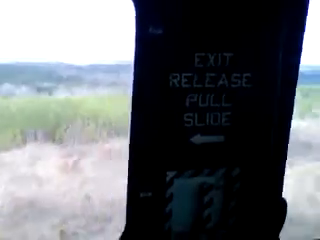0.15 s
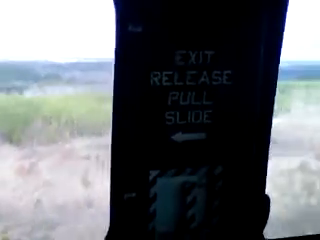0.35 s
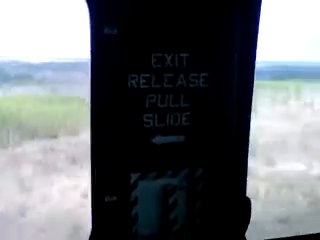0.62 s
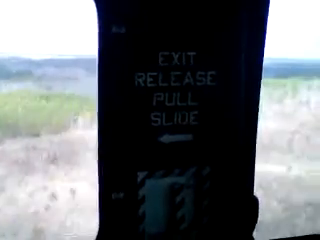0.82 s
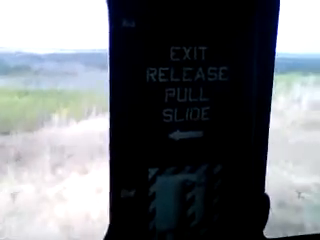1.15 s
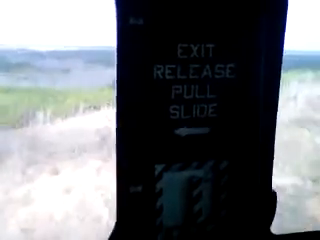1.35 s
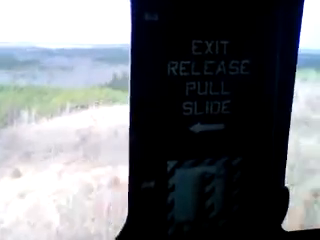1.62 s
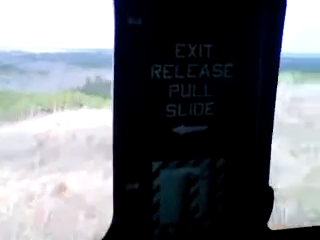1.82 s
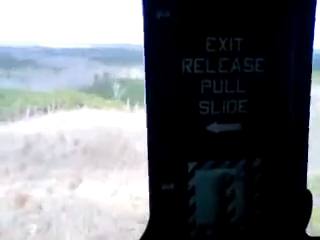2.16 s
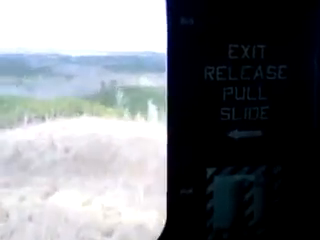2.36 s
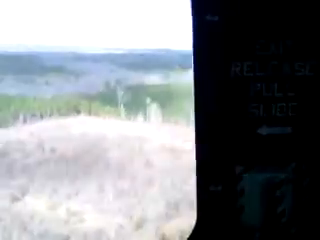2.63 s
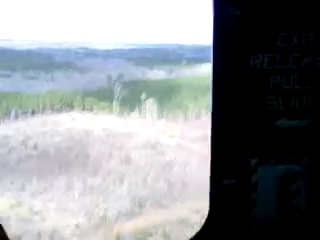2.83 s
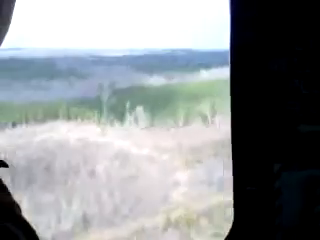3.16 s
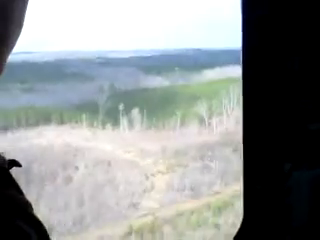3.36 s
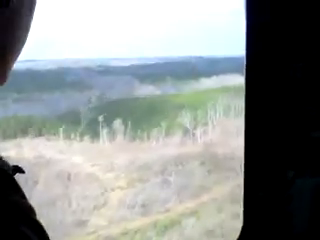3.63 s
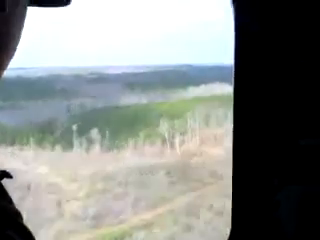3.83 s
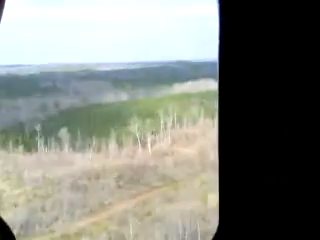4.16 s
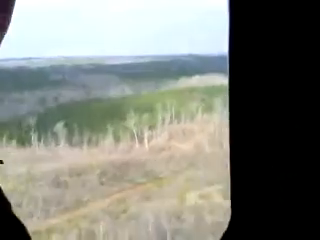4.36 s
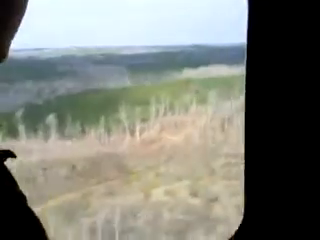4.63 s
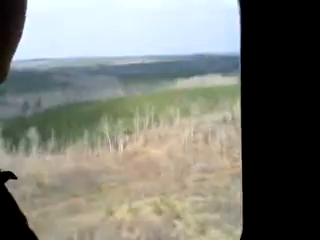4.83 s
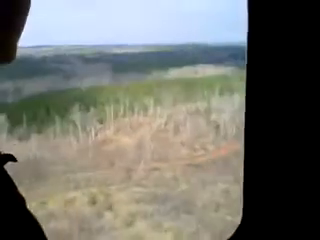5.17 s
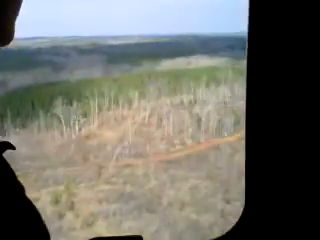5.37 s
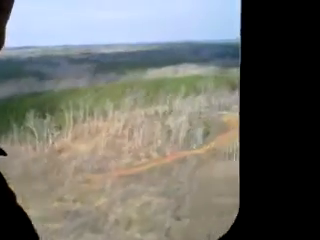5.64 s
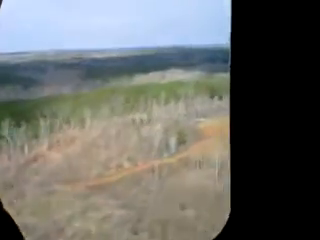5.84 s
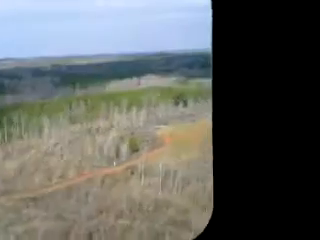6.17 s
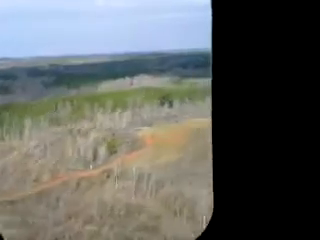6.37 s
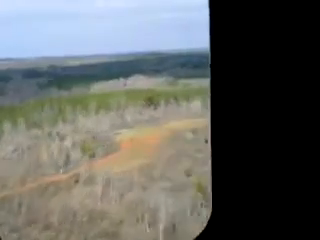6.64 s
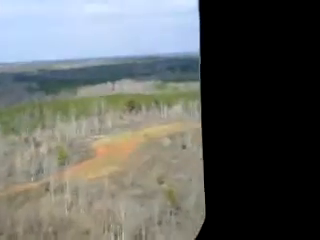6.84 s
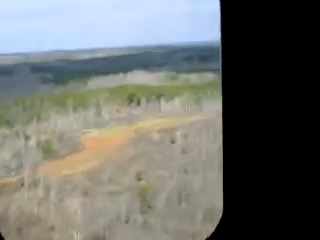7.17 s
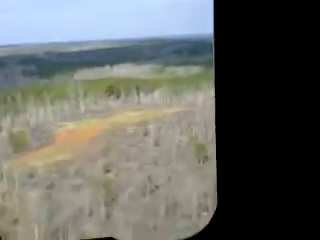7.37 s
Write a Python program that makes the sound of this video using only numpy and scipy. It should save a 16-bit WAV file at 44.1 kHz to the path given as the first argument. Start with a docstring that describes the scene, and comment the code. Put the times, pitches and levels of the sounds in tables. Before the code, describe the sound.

Heard from a seat by the door of a flying helicopter, a deep cabin boom and rushing wind run without a break, throbbing with the rotor blades. Thin, wavering turbine and gear whines and a faint hiss sit underneath, while loose trim ticks irregularly and short low buffets come more often in the second half. The din overdrives a small microphone, so everything sounds harsh and compressed.

```python
"""A gritty, booming roar fills the cabin of a helicopter in level flight, pulsing with the main rotor.
Turbulence drives it: the slipstream rushes along the skin, buffets the cabin and sets panels droning.
Behind it the tail rotor and shafts hum, gears and turbine whine, a door seal hisses and loose trim knocks.
The din overloads a small camera microphone, which flattens the roar into a nearly square wave."""
import sys
import numpy as np
from scipy import signal
from scipy.fft import rfft, irfft, next_fast_len
from scipy.io import wavfile
from scipy.ndimage import map_coordinates

SR = 44100
rng = np.random.default_rng(int(sys.argv[2]) if len(sys.argv) > 2 else 0)


def inscribe(sig):
    """Save sig as 16-bit PCM at rate SR to the path in sys.argv[1].

    A 1-D sig is mono; a 2-D sig holds one channel per row.
    Samples are clipped to [-1, 1] before scaling.
    """
    pcm = np.round(np.clip(np.atleast_2d(sig).T, -1, 1) * 32767)
    wavfile.write(sys.argv[1], SR, pcm.astype(np.int16))


N = 331191


def amp(db):
    """Amplitude ratio of a level in decibels."""
    return 10 ** (np.asarray(db) / 20)


def unit(x):
    """Normalisation to rms 1."""
    return x / np.sqrt(np.mean(x ** 2) + 1e-20)


def clock():
    """Uniform sampling: the time of each sample in seconds."""
    return np.arange(N) / SR


def curves(rows):
    """Linear interpolation: one value per sample for each column after the time."""
    times, *columns = np.transpose(rows)
    return [np.interp(clock(), times, column) for column in columns]


def wobble(rate):
    """Random modulation: a smooth curve through `rate` Gaussian values a second."""
    return map_coordinates(rng.standard_normal(2048), [clock() * rate], mode="wrap")


def swell(time, width):
    """Gaussian envelope; its width is the standard deviation in seconds."""
    return np.exp(-.5 * np.minimum(((clock() - time) / width) ** 2, 100))


def filtered(x, response):
    """Linear filtering: the spectrum of x times a frequency response."""
    size = next_fast_len(N + 8192)
    return irfft(rfft(x, size) * response(np.fft.rfftfreq(size, 1 / SR)), size)[:N]


def noise(spectrum):
    """Spectral shaping: noise of rms 1, its spectrum interpolated on a log frequency axis."""
    freqs, db = np.transpose(spectrum)
    white = rng.standard_normal(N)
    return unit(filtered(white, lambda hz: amp(np.interp(np.log(hz + 1), np.log(freqs), db))))


def resonance(centre_hz, half_width_hz):
    """Random excitation of a resonance: noise of rms 1 in one Lorentzian peak."""
    white = rng.standard_normal(N)
    return unit(filtered(white, lambda hz: 1 / (1 + ((hz - centre_hz) / half_width_hz) ** 2)))


# leakage through the door seal: (time [s], relative level [dB])
SEAL_LEAK = [(0.05, -46.5), (2.3, -49.5), (2.34, -46), (3.51, -47), (3.9, -43.5), (4.17, -52), (4.34, -43),
             (4.4, -49), (4.98, -39.5), (5.01, -45.5), (5.24, -45.5), (5.26, -45), (5.43, -47.5),
             (5.45, -48), (6.79, -48), (6.81, -43), (7.06, -46.5), (7.45, -46)]
# spectrum of the hiss: (frequency [Hz], relative density [dB])
SEAL_SPECTRUM = [(1500, -17), (3300, -0.5), (4400, 3), (5300, 1), (6500, -1.5), (7300, -8.5)]
def door_seal(rasp_db):
    """Leakage noise: the hiss grows with the gap or a rasp, and dips as a buffet lifts the air away."""
    leak_db, = curves(SEAL_LEAK)
    gap_db = 0.98 * (leak_db - leak_db.mean())
    stall_db = 7 * sum(swell(time, width) for time, width, _, _ in CABIN_BUFFETS)
    return amp(-41 + gap_db + 0.85 * rasp_db - stall_db) * noise(SEAL_SPECTRUM)


def trim_rattle(level_db):
    """Intermittent contact: loose trim buzzes in short fits."""
    fits = amp(10 * np.tanh(wobble(110)))
    return amp(level_db) * unit(resonance(centre_hz=3100, half_width_hz=1300) * fits)


# blows of the trim on its frame: (time [s], level [dB])
TRIM_BLOWS = [(0.170, -26), (1.721, -27.5), (1.963, -29.5), (2.340, -28.5), (3.251, -29), (3.465, -25.5),
              (3.89, -33), (3.955, -29.5), (4.484, -28), (4.562, -28), (4.614, -28.5), (4.630, -24),
              (4.658, -30.5), (4.771, -24), (5.124, -28), (5.372, -27.5), (5.538, -30), (5.751, -31),
              (6.021, -22), (6.799, -27), (6.810, -24.5), (6.838, -28), (7.164, -31), (7.219, -26.5),
              (7.304, -24), (7.338, -27.5), (7.353, -28.5)]
def trim_knocks(attack_s, t60_s):
    """Impact excitation: each blow rings a damped resonance, heard as a dry clack."""
    envelope = np.zeros(N)
    for time, db in TRIM_BLOWS:
        age = np.maximum(clock() - time, 0)
        envelope += amp(db - 60 * age / t60_s) * (1 - np.exp(-age / attack_s))
    return envelope * resonance(centre_hz=2950, half_width_hz=640)


# whine of the compressor: (time [s], level [dB])
COMPRESSOR_LEVEL = [(0, -42.5), (0.2, -44.5), (0.5, -44), (1.15, -44.5), (1.33, -42), (1.5, -48),
                    (2.25, -45.5), (2.4, -41), (2.95, -47.5), (4.62, -42.5), (4.75, -39), (4.95, -41.5),
                    (5.1, -46), (5.6, -42), (5.95, -47), (6.2, -42), (6.65, -44), (6.9, -41), (7.12, -47.5),
                    (7.45, -43)]
def turbine(centre_hz, half_width_hz, wander_hz, flicker_db):
    """Spectral broadening: the compressor's whine is a narrow band that wanders and flickers."""
    level_db, = curves(COMPRESSOR_LEVEL)
    analytic = signal.hilbert(resonance(centre_hz, half_width_hz), next_fast_len(N))[:N]
    frequency_shift = np.exp(2j * np.pi * np.cumsum(wander_hz * wobble(30)) / SR)
    band = np.real(analytic * frequency_shift)
    return amp(level_db) * unit(band * amp(flicker_db * wobble(25)))


# drift of the governed shaft: (time [s], excess speed [fraction])
SHAFT_DRIFT = [(0, .0004), (1.1, .001), (2.7, -.0006), (4.4, -.0012), (6, .0005), (7.3, -.0012)]
def shaft_time(jitter):
    """Rotation is the integral of speed: the shaft's progress, in seconds at nominal speed."""
    drift, = curves(SHAFT_DRIFT)
    return clock() + np.cumsum(drift + jitter * wobble(9)) / SR


def shaft_tone(hz, shaft, flutter_db):
    """Amplitude modulation: a shaft-locked tone of rms 1 flutters on its way through the airframe."""
    return unit(np.sin(2 * np.pi * (hz * shaft + rng.random())) * amp(flutter_db * wobble(7)))


# tones of the tail rotor, drive shafts and lesser gears: (frequency [Hz])
DRIVE_FREQUENCIES = [55.4, 110.7, 138.6, 220, 300.1, 524, 637.2, 658.8, 1004.3, 1876, 1934]
# the same tones, in order: (level [dB])
DRIVE_LEVELS = [-43.5, -37.5, -39.5, -42, -51, -46, -47, -44.5, -46.5, -62, -51.5]
def drive_train(shaft):
    """Periodic forcing: rotating parts hum at fixed ratios; the low tones flutter most."""
    return sum(amp(db) * shaft_tone(hz, shaft, flutter_db=4.0 if hz < 600 else 1.5)
               for hz, db in zip(DRIVE_FREQUENCIES, DRIVE_LEVELS))


# the three loudest gear meshes: (frequency [Hz])
MESH_FREQUENCIES = [502.3, 647.7, 1652]
# their relative levels: (time [s], low mesh [dB], middle mesh [dB], high mesh [dB])
MESH_LEVELS = [(0, -51.5, -46, -49), (0.8, -43.5, -55.5, -46.5), (1.55, -42, -45.5, -48.5),
               (2, -45.5, -47, -52), (2.65, -44.5, -48.5, -49.5), (3.1, -51.5, -43, -56.5),
               (3.85, -42.5, -45.5, -54.5), (4.3, -48.5, -50, -63.5), (5.2, -44.5, -46, -53),
               (6.1, -47, -47, -50.5), (6.65, -43.5, -45.5, -56.5), (7.3, -46.5, -46.5, -50)]
# thin whistle of the small pinion: (time [s], level [dB])
PINION_WHISTLE = [(0, -48.5), (1, -47), (2, -51.5), (2.4, -62), (4.2, -56), (4.42, -41.5), (4.6, -51.5),
                  (6.5, -50.5), (7.3, -49.5)]
def gears(shaft, pinion_hz):
    """Gear meshing: each pair whines at the rate its teeth engage."""
    meshes = sum(amp(db + 5.5) * shaft_tone(hz, shaft, flutter_db=1.0)
                 for hz, db in zip(MESH_FREQUENCIES, curves(MESH_LEVELS)))
    pinion_db, = curves(PINION_WHISTLE)
    return meshes + amp(pinion_db) * shaft_tone(pinion_hz, shaft, flutter_db=2.0)


# gusts on the panels: (time [s], frequency [Hz], level [dB])
PANEL_GUSTS = [(0.169, 215, -27.5), (0.93, 142.6, -26), (1.361, 200.5, -25.5), (1.81, 196.4, -26),
               (1.93, 204.4, -31), (2.2, 174.9, -26), (2.34, 686, -35.5), (2.39, 200.3, -28),
               (3.05, 278, -25), (3.85, 560, -28), (4.13, 640, -30), (4.23, 220, -26.5),
               (4.708, 188.7, -27.5), (5.27, 258.7, -24.5), (5.63, 187, -24.5), (6.09, 490, -26),
               (6.13, 131, -26.5), (6.301, 205, -26.5), (6.41, 198.8, -24.5), (6.515, 203, -25.5),
               (6.6, 257, -27), (7.15, 280, -29.5)]
def panels(wander, width_s):
    """Plate vibration: a gust makes a panel drone briefly; its pitch staggers as it flexes."""
    drones = np.zeros(N)
    for time, hz, db in PANEL_GUSTS:
        phase = 2 * np.pi * hz * np.cumsum(1 + wander * wobble(90)) / SR
        drones += amp(db) * swell(time, width_s) * np.sqrt(2) * np.sin(phase)
    return drones


# harmonics of the main rotor: (multiple of the blade rate [1], relative level [dB])
ROTOR_HARMONICS = [(1, -43.5), (2, -47.5), (3, -40), (4, -36.5), (5, -44.5), (10, -40.5)]
# blades that thump harder: (time [s], boost [dB])
HARD_THUMPS = [(0.67, 3), (1.029, 3.5), (1.43, 7), (2.24, 6), (2.79, 2.5), (2.98, 1.5), (3.63, 4.5),
               (4.28, 3.5), (5.19, 4)]
def main_rotor(blade_phase):
    """Superposition: harmonics in phase add up to one thump per blade, no two equally hard."""
    thumps = sum(amp(db) * np.sqrt(2) * np.cos(k * blade_phase) for k, db in ROTOR_HARMONICS)
    accent_db = sum(db * swell(time, 0.04) for time, db in HARD_THUMPS)
    return thumps * amp(accent_db + 1.3 * wobble(BLADE_HZ) - 2.5)


# rasps of air: (time [s], width [s], level change [dB])
AIR_RASPS = [(0.218, 0.035, 1.5), (2.772, 0.032, 2), (4.7, 0.1, -1), (5.413, 0.041, 3), (7.179, 0.008, 3.5)]
def rasps():
    """Unsteady flow: brief changes in the slipstream's level, in decibels."""
    return sum(db * swell(time, width) for time, width, db in AIR_RASPS)


# strength of the slipstream: (time [s], relative level [dB])
FLOW_LEVEL = [(0, -36.5), (0.9, -33.5), (2.25, -35.5), (4.2, -35), (4.9, -33.5), (5.7, -35.5), (6.7, -34.5),
              (7.3, -35)]
# spectrum of the slipstream: (frequency [Hz], relative density [dB])
FLOW_SPECTRUM = [(150, -32), (350, 0), (500, -1), (720, 1.5), (1000, -2), (1400, -5.5), (2200, -6.5),
                 (3200, -8), (3800, -12), (5000, -29)]
def slipstream(flow_db, wash):
    """Flow noise: air rushes along the skin, harder under each passing blade."""
    return amp(flow_db + 3.0 + 0.56 * wash + 0.63 * wobble(45)) * noise(FLOW_SPECTRUM)


# buffets on the cabin: (time [s], width [s], frequency [Hz], level [dB])
CABIN_BUFFETS = [(0.465, 0.0064, 111.8, -28), (2.971, 0.0073, 150, -23.5), (3.498, 0.0055, 151.8, -23),
                 (3.741, .006, 169, -23), (4.104, 0.018, 170, -27.5), (4.599, 0.011, 200.6, -28.5),
                 (5.217, 0.0056, 130, -21.5), (5.278, .012, 150, -23), (5.462, .006, 160, -20),
                 (5.498, 0.0053, 200.5, -27), (5.535, .006, 203, -25), (6.794, 0.0063, 180.2, -25.5),
                 (7.123, .009, 210.6, -22), (7.238, 0.0061, 130, -24.5), (7.325, 0.0054, 95, -18.5)]
def buffets():
    """Transient excitation: each buffet swings the cabin for a few cycles, at a random phase."""
    booms = np.zeros(N)
    for time, width, hz, db in CABIN_BUFFETS:
        swing = np.sqrt(2) * np.sin(2 * np.pi * (hz * clock() + rng.random()))
        booms += amp(db) * swell(time, width) * swing
    return booms


# boom of the cabin: (time [s], level [dB])
CABIN_LEVEL = [(0, -27.5), (.95, -25), (1.9, -25.5), (2.4, -24), (3.1, -25), (4.1, -25.5), (5.1, -26),
               (6.4, -24.5), (6.9, -25)]
# spectrum of the boom: (frequency [Hz], relative density [dB])
CABIN_SPECTRUM = [(5, -23), (15, -15), (45, -9.5), (72, -8), (100, -2.5), (160, -3), (205, 1.5),
                  (242, -4.5), (265, -1.5), (300, -7), (420, -10.5), (600, -16), (900, -29), (2000, -59.5)]
def cabin_boom(wash):
    """Forced vibration: turbulence makes the cabin boom, swelling slightly with each blade's wash."""
    boom_db, = curves(CABIN_LEVEL)
    return amp(boom_db + .5 * wash + 0.64 * wobble(9)) * noise(CABIN_SPECTRUM)


BLADE_HZ, FIRST_BLADE_S, WASH_LAG_S = 10.81, .019, .03
def scene():
    """Superposition: the pressures of all sources add at a seat by the door."""
    rasp_db = rasps()  # a rasp stirs the skin, the seal and the trim
    flow_db, = curves(FLOW_LEVEL)
    shaft = shaft_time(jitter=0.000696)
    blade_phase = 2 * np.pi * BLADE_HZ * (shaft - FIRST_BLADE_S)
    wash = np.cos(blade_phase - 2 * np.pi * BLADE_HZ * WASH_LAG_S)  # follows each thump
    air = cabin_boom(wash) + buffets() + slipstream(flow_db + rasp_db, wash) + door_seal(rasp_db)
    whine = turbine(centre_hz=4032, half_width_hz=59, wander_hz=21.96, flicker_db=1.1)
    trim = trim_rattle(flow_db + 2.4 * rasp_db - 12.5) + trim_knocks(attack_s=0.00098, t60_s=0.048)
    drones = panels(wander=0.12, width_s=0.032)
    machinery = main_rotor(blade_phase) + drive_train(shaft) + gears(shaft, pinion_hz=3191)
    return (air + whine + trim + drones + machinery)[None]


def overload(x, knee_db, ceiling_db, choke_db, split_hz):
    """Saturation: the roar flattens; the treble rides on its tops, choked only by the largest swings."""
    roar = filtered(x, lambda hz: 1 / (1 + (hz / split_hz) ** 4))
    flat = amp(ceiling_db) * np.tanh(roar / amp(knee_db)) + 0.081 * roar
    rounded = filtered(flat, lambda hz: 1 / np.sqrt(1 + (hz / 4300) ** 4))
    sway = 0.39 * filtered(x, lambda hz: 1 / (1 + (hz / 60) ** 4))  # the deepest thumps lift the tops
    treble = (x - roar) / np.sqrt(1 + (roar / amp(choke_db)) ** 4)
    return rounded + sway + treble


BAND_LIMIT_HZ = 7330
def record(dry):
    """Distortion and band limiting: the microphone overloads, and the camera cuts the top treble."""
    heard = overload(dry[0], knee_db=-29.0, ceiling_db=-23.5, choke_db=-20, split_hz=3470)
    return filtered(heard, lambda hz: hz < BAND_LIMIT_HZ)[None]


dry = scene()
out = record(dry)
inscribe(out)
```